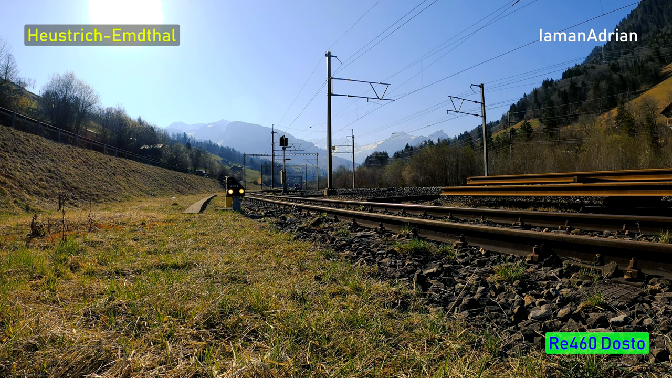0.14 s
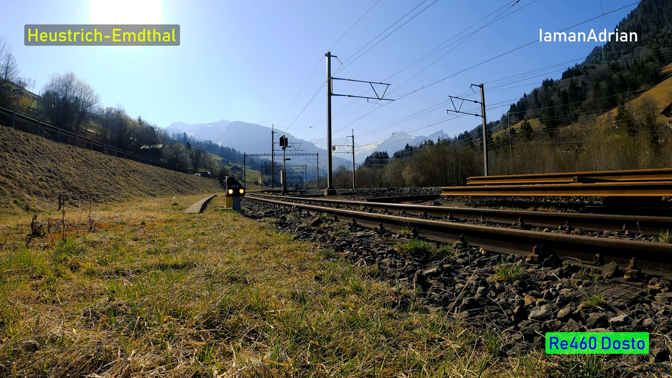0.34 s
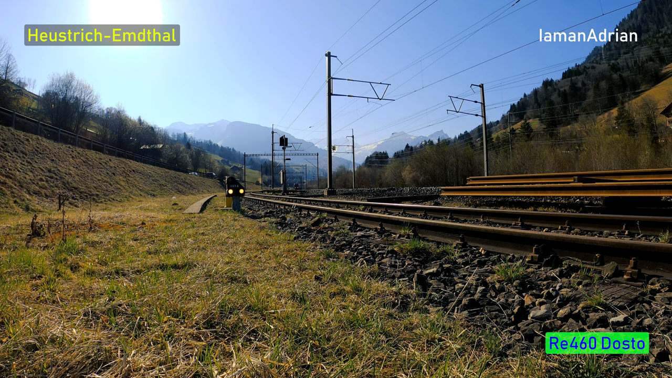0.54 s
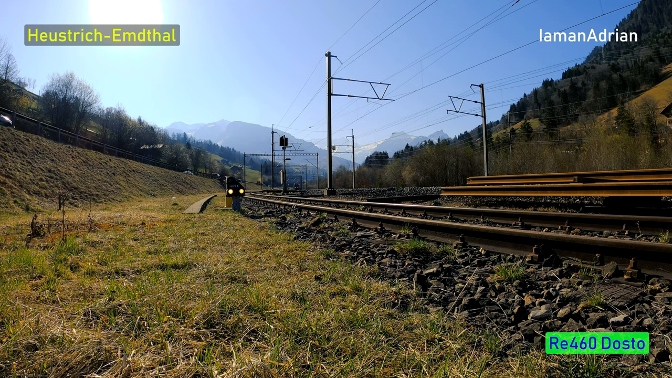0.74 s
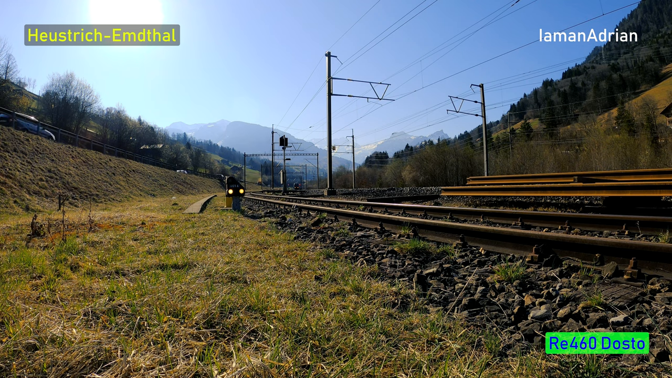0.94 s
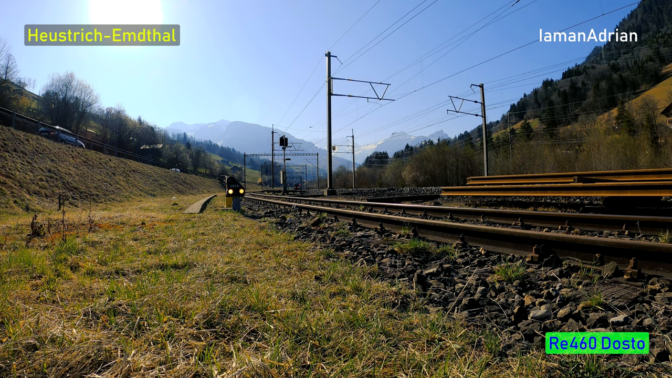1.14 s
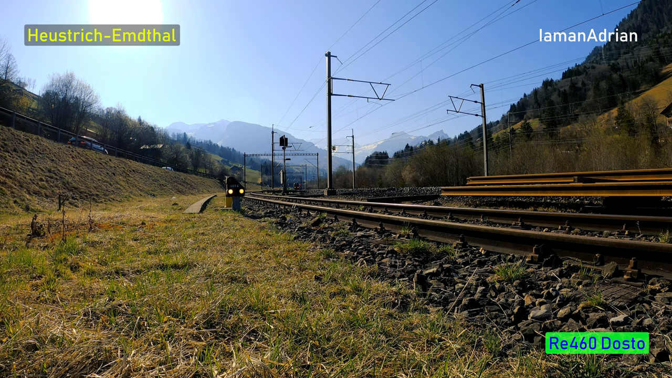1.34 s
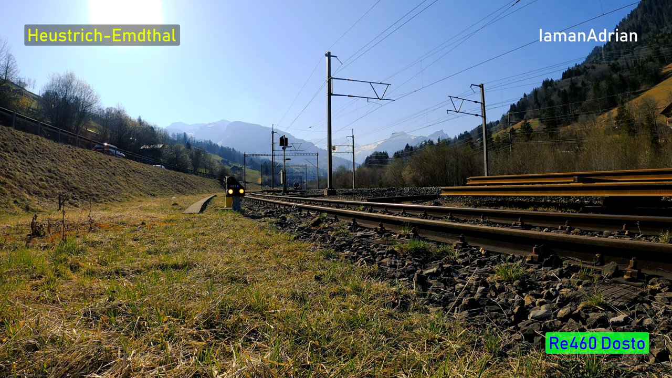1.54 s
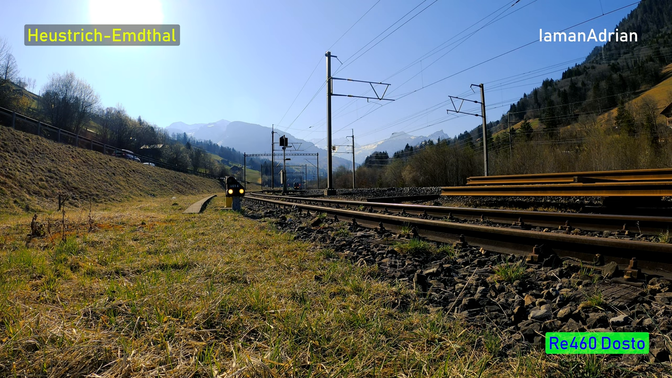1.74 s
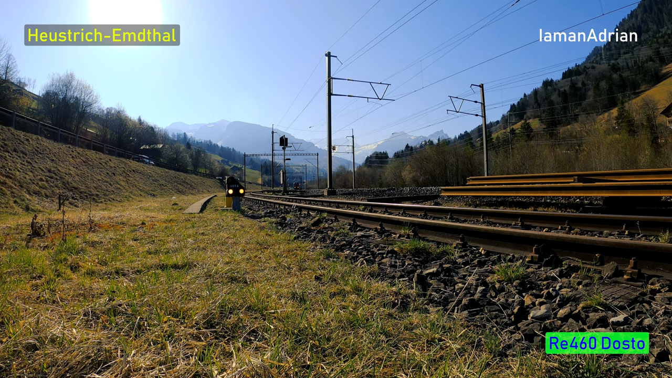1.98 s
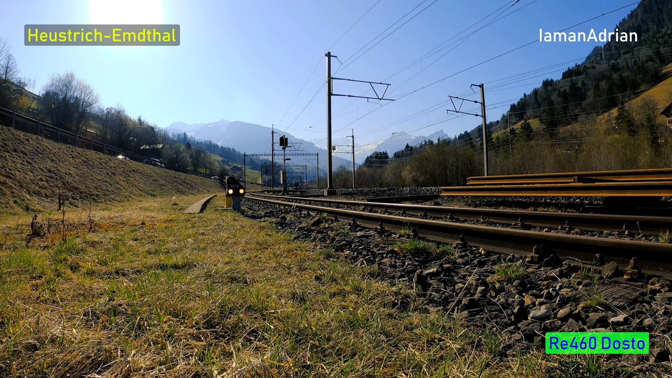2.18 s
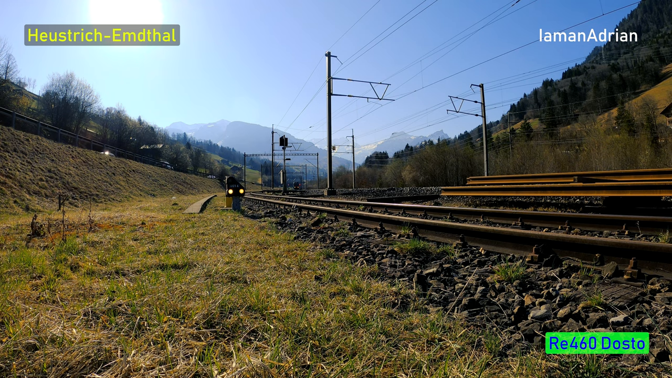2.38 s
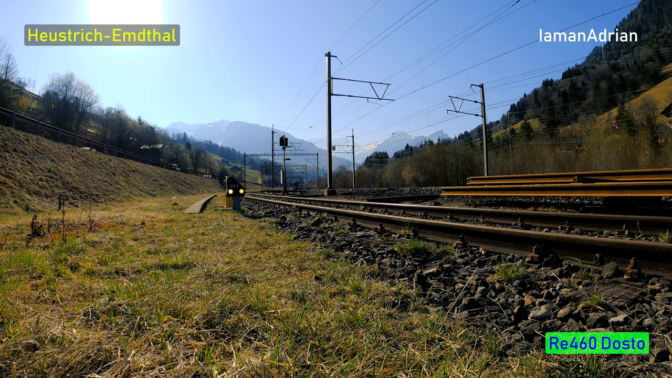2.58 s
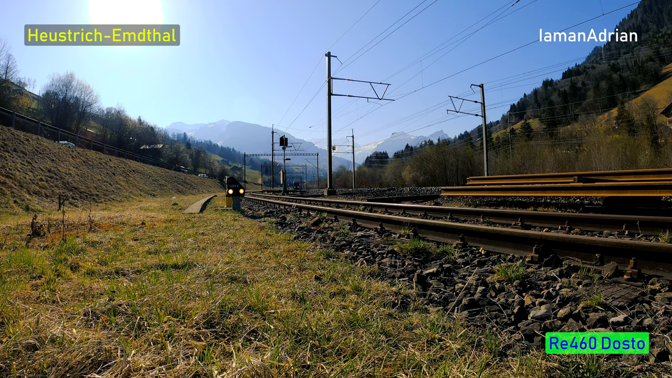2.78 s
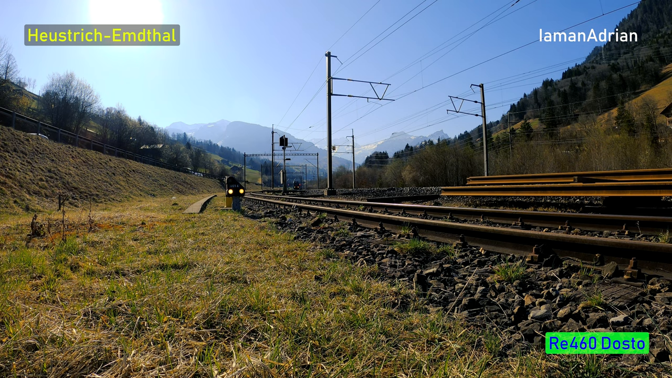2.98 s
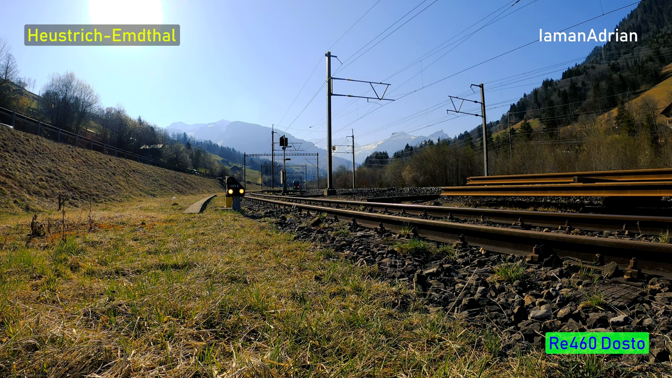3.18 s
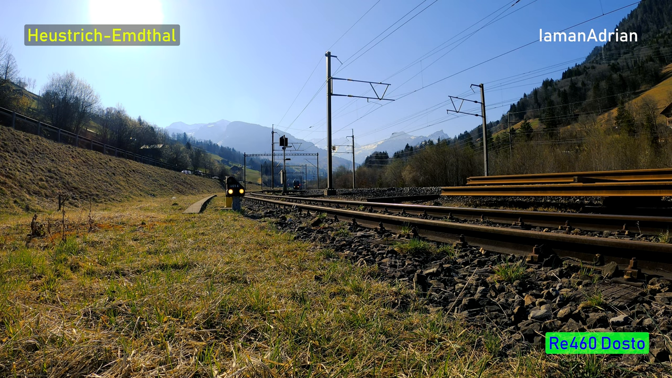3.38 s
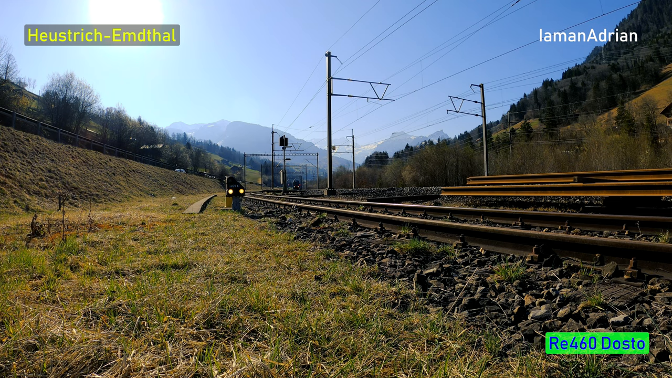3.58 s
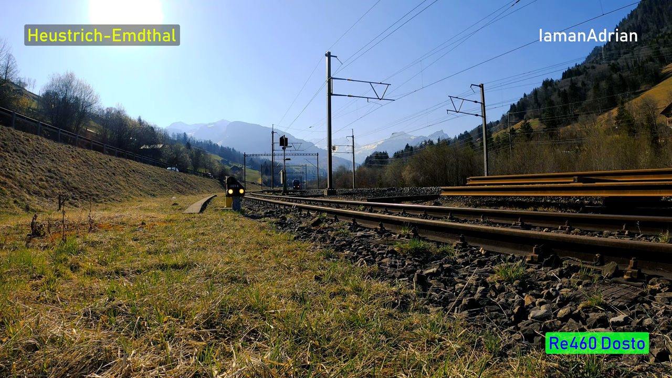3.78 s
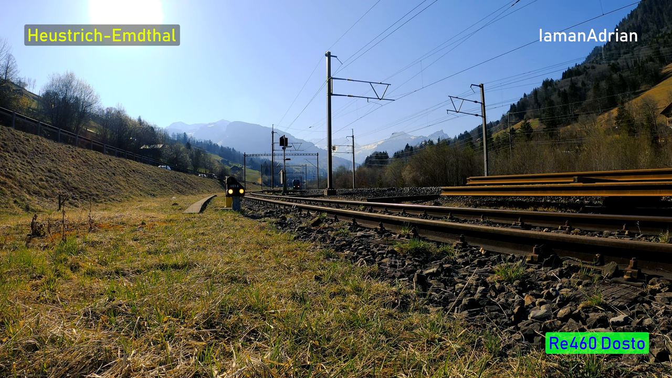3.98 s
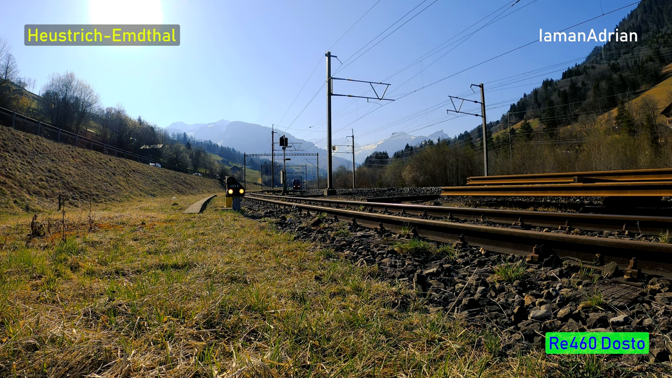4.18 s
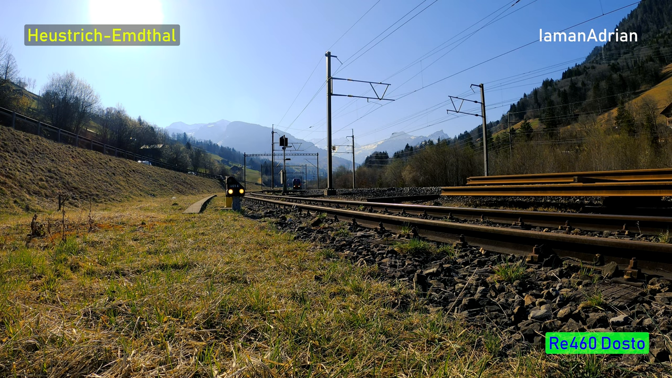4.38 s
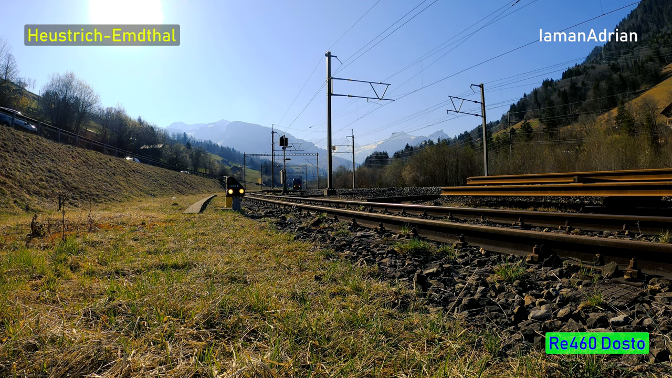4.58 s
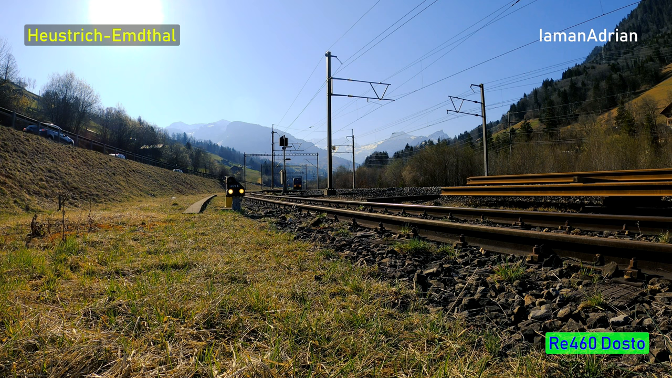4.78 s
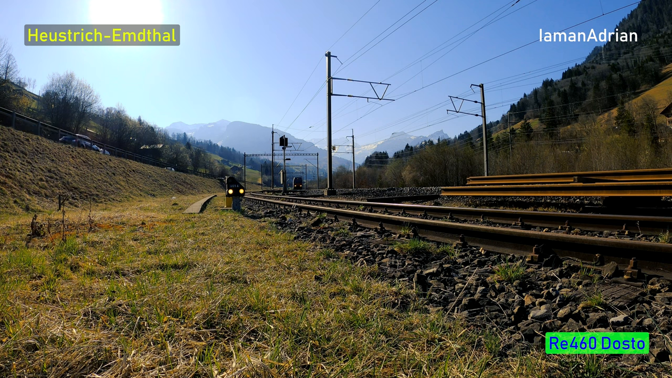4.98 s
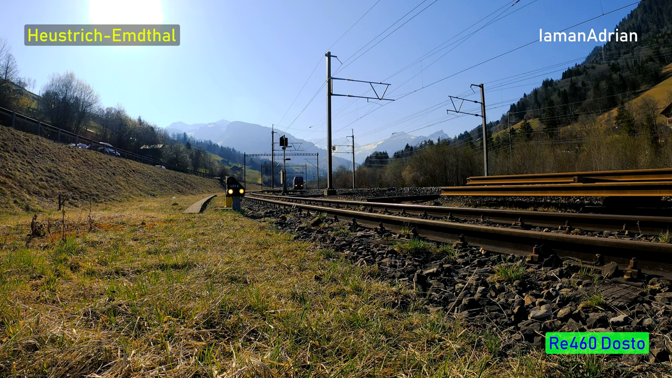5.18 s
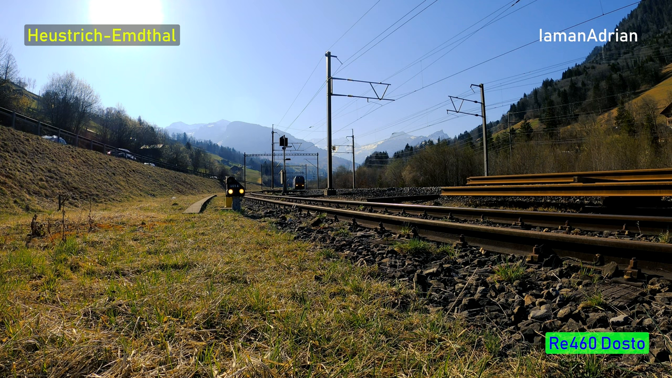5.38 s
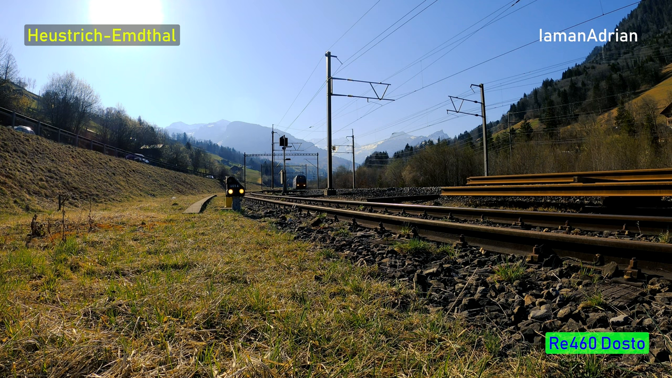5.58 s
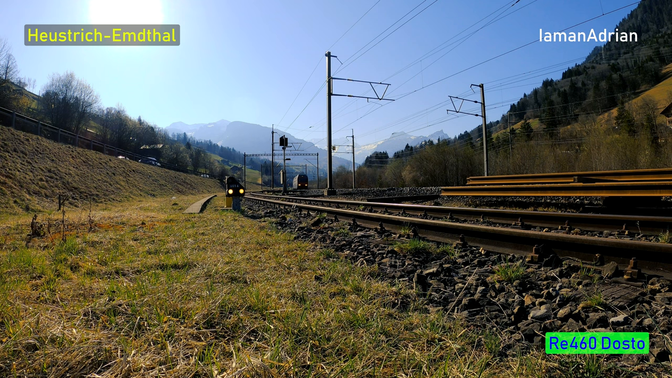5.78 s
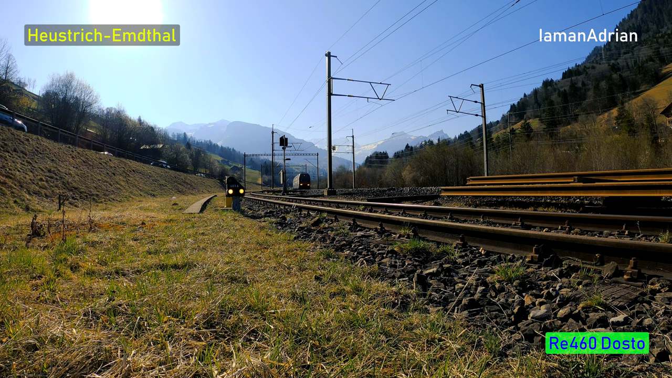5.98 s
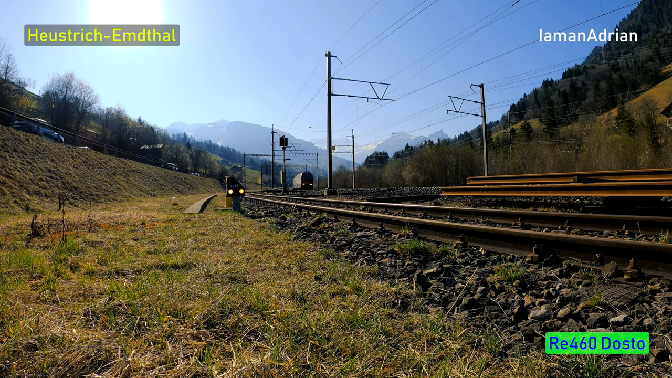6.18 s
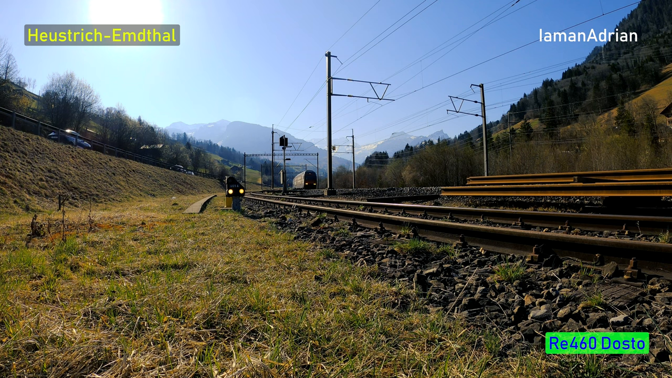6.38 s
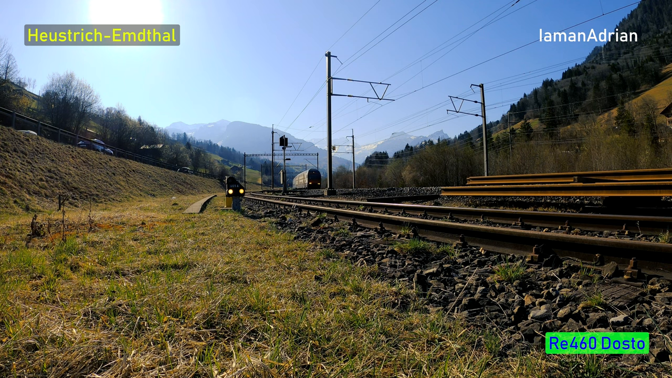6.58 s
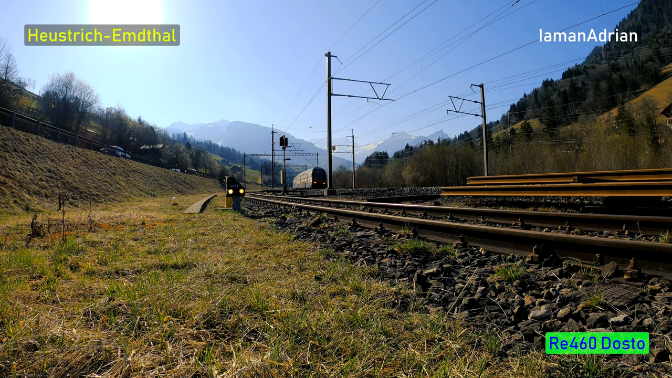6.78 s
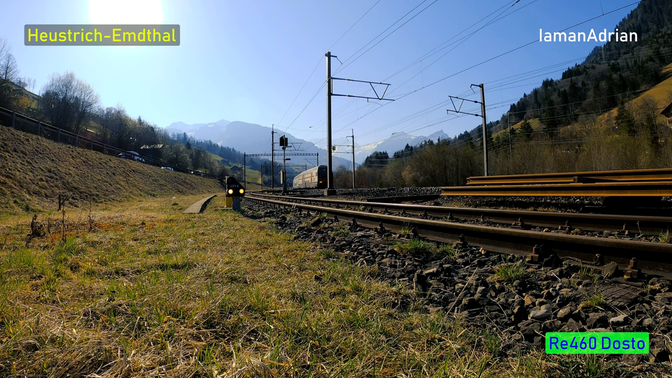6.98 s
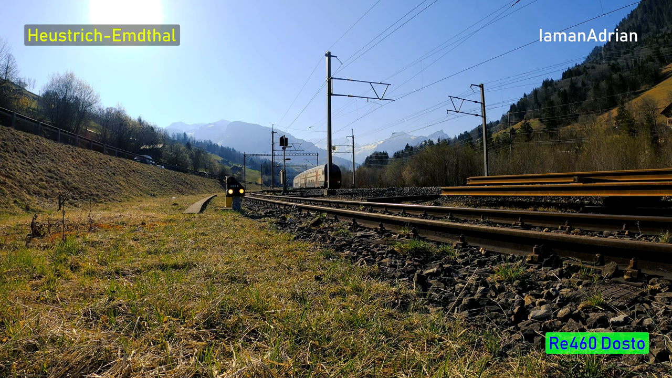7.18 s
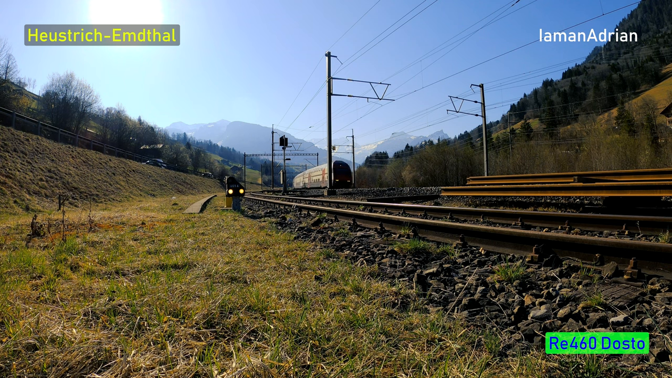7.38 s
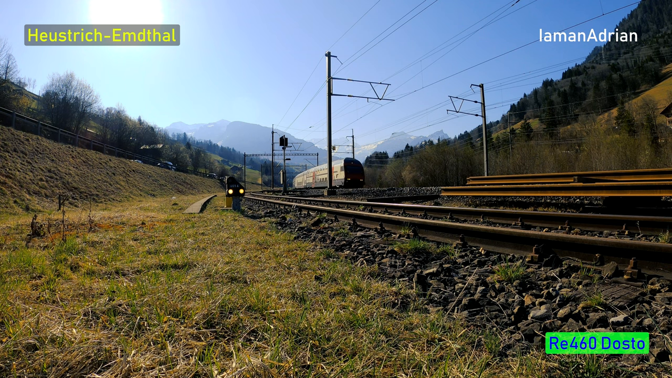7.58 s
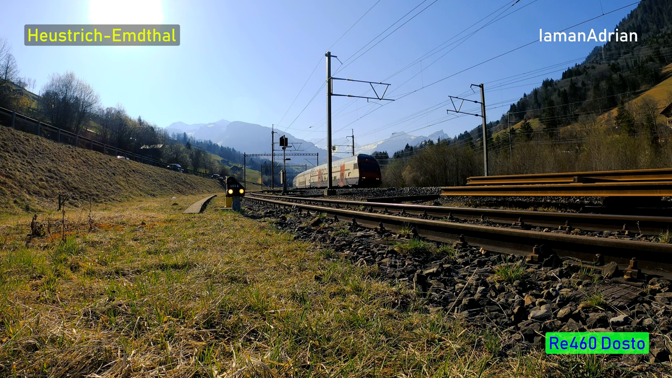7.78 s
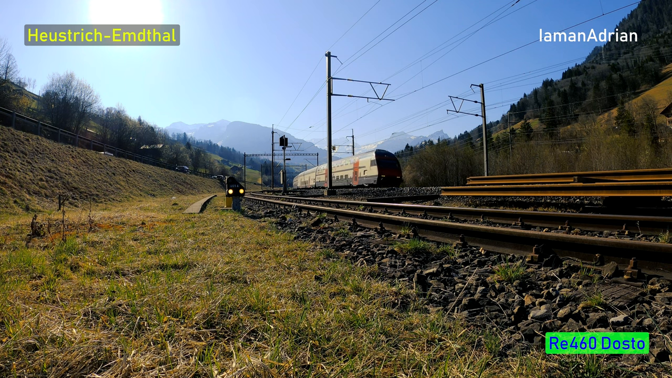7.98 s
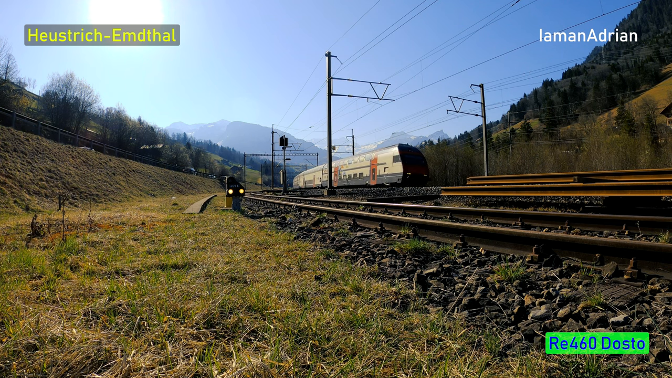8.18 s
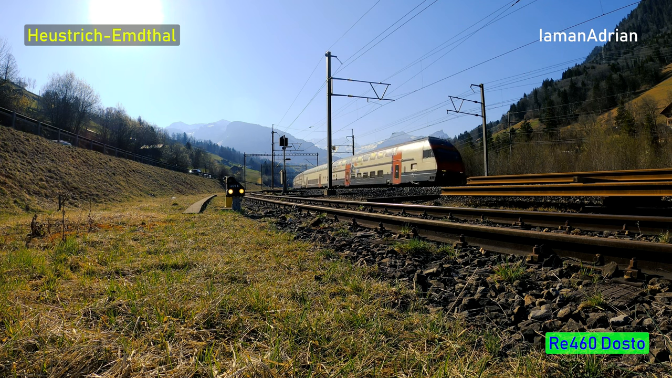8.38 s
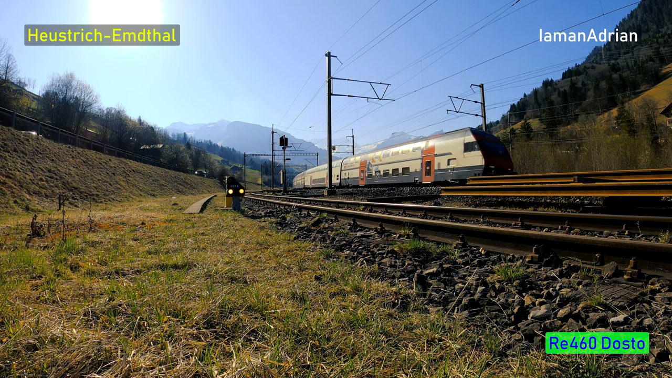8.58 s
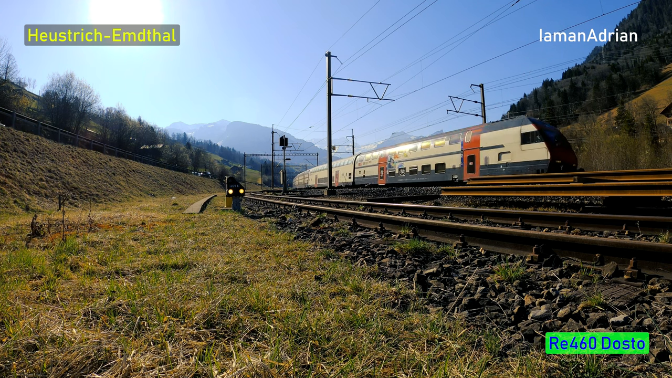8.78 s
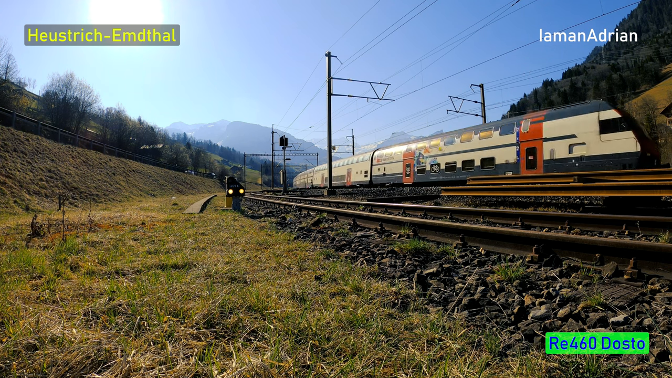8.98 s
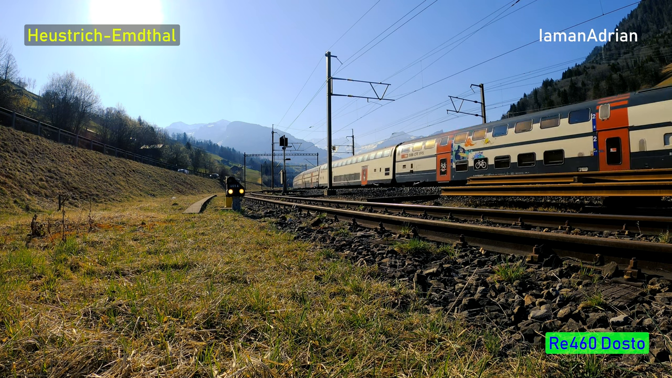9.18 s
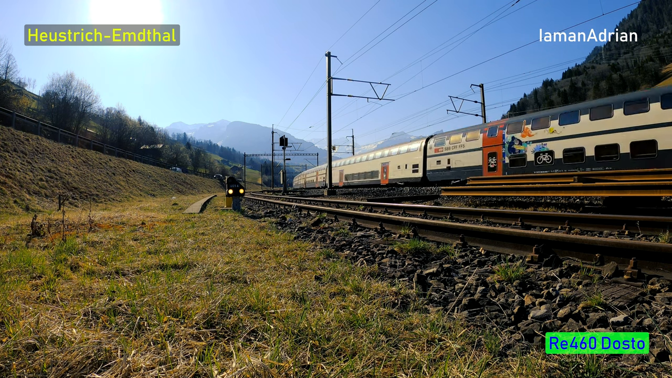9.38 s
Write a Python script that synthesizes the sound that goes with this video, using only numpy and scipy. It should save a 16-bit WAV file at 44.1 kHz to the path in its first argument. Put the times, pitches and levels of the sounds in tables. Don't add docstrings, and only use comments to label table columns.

```python
import sys
import numpy as np
from scipy import signal
from scipy.fft import rfft, irfft, next_fast_len
from scipy.io import wavfile
from scipy.ndimage import uniform_filter1d

SR = 44100
rng = np.random.default_rng(int(sys.argv[2]) if len(sys.argv) > 2 else 0)


def linear_from_db(decibels):
    return 10 ** (np.asarray(decibels, float) / 20)


def unload_audio(sound):
    columns = np.transpose(np.atleast_2d(sound))
    steps = np.round(np.clip(columns, -1, 1) * 32767)
    wavfile.write(sys.argv[1], SR, steps.astype(np.int16))


N = 416734

SIZE, HOP = 1024, 256
HZ = np.fft.rfftfreq(SIZE, 1 / SR)[:, None]
T = np.arange(N // HOP + 5) * HOP / SR
NEAR_DB = -41.5

BANDS = {"road": (1400, 3500), "roar": (700, 2500), "spray": (6500, 10000), "body": (320, 600),
         "wheels": (10000, 14000), "rails": (200, 500)}

# time in seconds, tyre hiss in dB, centre of the ground-echo hump in Hz, hump height
# in dB.
ROAD_TRAFFIC = [(0.28, -47, 2900, 0.3), (0.44, -45, 2950, 3), (0.62, -47, 2500, -1), (0.9, -43.5, 1520, 4),
                (1.3, -43, 1770, 4.5), (1.75, -43, 1990, 3), (2.0, -45, 1740, 1.5), (2.31, -42, 1670, 3.5),
                (2.64, -43.5, 1700, 2), (3.03, -40, 1860, 6.5), (3.4, -42.5, 1550, 5),
                (3.96, -43.5, 1680, 1.5), (4.62, -42, 1750, 4), (5.95, -42, 1700, 3),
                (6.15, -41, 1650, 4.5), (7.4, -42.5, 1660, 3.5), (8.6, -43.5, 1570, 2),
                (9.45, -40.5, 1720, 3.5)]
# frequency in Hz, density in dB per Hz.
ROAD_TONE = [(250, -36), (350, -10.5), (520, -19.5), (700, -14), (870, -7), (1050, -0.5), (1300, -3),
             (1700, -2), (2200, -3), (3000, -5), (4000, -15), (5500, -30), (7000, -37.5), (13000, -81.5)]
# frequency in Hz, likeness 0-1.
ROAD_SAME = [(300, 1), (760, 0.78), (1430, 1), (2700, 0.79), (5000, 1), (9000, 0.61)]
# frequency in Hz, left over right in dB.
ROAD_LEFT = [(400, 0.5), (800, 3), (1500, 0.5), (2500, 5), (5000, 2), (9000, 5.5)]
# frequency in Hz, lead in radians.
ROAD_LEAD = [(300, 0.31), (3000, -0.58), (5250, -0.29)]
# time in seconds, extra tilt in dB per octave,
# half length in seconds.
AIR_SWISHES = [
    (0.44, 4.5, 0.2),
    (1.95, 1.5, 0.41),
    (5.25, -1.3, 0.38),
    (7.3, 2, 0.29),
    (8.0, -0.2, 0.26),
    (9.35, 0.2, 0.29),
]

# time abreast in seconds, tread roar in dB, half length in seconds, closeness 0-1.
CARS = [
    (0.389, -42.5, 0.59, 1.01),
    (3.0, -55.5, .3, 0.4),
    (4.003, -40.5, 0.55, 1.02),
    (4.748, -44.5, 0.61, 0.83),
    (5.552, -44, .4, 1.05),
    (6.502, -43.5, 0.59, .92),
    (7.5, -45, 0.71, 0.8),
    (8.4, -50.5, .4, .45),
    (9.05, -47.5, .25, .8),
    (9.5, -44.5, 0.39, 1.1),
]
# frequency in Hz, level in dB.
ROAR_TONE = [(300, -27), (450, -11.5), (700, -6.5), (870, -3), (1050, 2.5), (1300, -2.5), (1700, -8),
             (2400, -36)]
# frequency in Hz, level in dB.
SPRAY_TONE = [(2500, -4.5), (3500, 9.5), (4500, 11.5), (5500, 5), (7000, -3.5), (9000, -10.5),
              (10500, -21.5), (12000, -26), (14000, -48)]
# frequency in Hz, left over right in dB.
CARS_LEFT = [(400, 3), (800, 10.5), (1200, 9), (4000, 14), (7000, -3), (10000, 7.5), (13000, 4.5)]
# time in seconds, clearness 0-1, half length in seconds.
BANK_GAPS = [
    (-0.05, 1.2, 0.41),
    (3.5, .95, .3),
    (3.9, 1, 0.093),
    (4.4, 0.17, .25),
    (4.85, 0.56, .3),
    (5.35, .85, 0.31),
    (6.6, .3, 0.46),
    (8.05, 0.6, 0.37),
    (9.05, 0.98, 0.58),
]

# time in seconds, level in dB.
VALLEY = [(0.0, -47.5), (0.7, -46.5), (1.6, -50), (2.5, -48), (3.2, -47), (4.0, -46), (4.4, -43.5),
          (5.1, -44.5), (5.75, -44), (6.6, -45), (7.6, -44), (8.45, -45), (8.8, -38.5), (9.25, -40),
          (9.45, -41)]
# time in seconds, level in dB, half length in seconds.
DEEP_SWELLS = [(0.2, -38.5, 0.42), (3.0, -43, 0.11), (3.5, -42.5, 0.17), (4.1, -41.5, 0.3),
               (5.0, -40, 0.35), (5.5, -40, 0.27), (6.0, -38.5, 0.079), (6.7, -40, .4), (7.2, -41, 0.28),
               (7.9, -40, 0.15), (9.0, -37, .14), (9.45, -35.5, 0.14)]
# frequency in Hz, density in dB per Hz.
DEEP_TONE = [(12, -30.5), (20, -18), (28, -3.5), (38, 3.5), (50, 1), (80, 4.5), (105, -6.5), (130, -5.5),
             (170, -30.5)]
# frequency in Hz, density in dB per Hz.
DRONE_TONE = [(50, -12.5), (85, -5.5), (113, -4), (227, -8.5), (340, -21), (440, -57.5), (750, -120)]
# frequency in Hz, level in dB.
BODY_TONE = [(250, -20), (320, -7), (420, 0.5), (550, 2), (700, 4), (850, -22.5)]

# time in seconds, firing rate in Hz, level in dB.
ENGINES = [
    [(0, 65, -42), (.3, 63.5, -39), (.6, 61.5, -41), (2.2, 59.5, -49), (4.2, 58.5, -58)],
    [(3.2, 92, -60), (3.8, 91, -50), (4.6, 88, -49), (5.2, 85, -47), (5.9, 79.5, -48)],
    [(5.85, 79.5, -48), (6.2, 78.5, -49), (7.2, 77, -50), (8.1, 75, -47), (8.6, 73.5, -48),
     (9.2, 72.5, -44), (9.45, 72, -47)],
    [(4.9, 50, -56), (5.2, 50.5, -40), (5.6, 49, -36), (5.8, 46, -39), (5.93, 43, -54), (6.07, 40, -37),
     (6.2, 40, -58)],
    [(4.95, 34, -56), (5.2, 33.5, -42), (5.6, 33, -42), (5.8, 33, -56)],
    [(6.1, 48.5, -56), (6.5, 48.5, -47), (7.4, 49, -46), (7.65, 49.2, -39), (8.25, 49.2, -43),
     (8.5, 49.2, -38), (9.1, 49, -35), (9.45, 47.5, -36)],
    [(.3, 241, -68), (.45, 240, -51), (.62, 240, -51), (.8, 239, -68)],
]
# relative level at start in dB, at end in dB.
OCTAVES = [(-30, -18), (-16, -18), (-7, -6), (-26, -28), (-14, -14), (-28, -17), (-25, -25)]

# time in seconds, buffeting at each port in dB, half length in seconds.
GUSTS = [
    (0.7, -60, 0.45),
    (5.0, -51.5, 0.4),
    (7.5, -49.5, 0.36),
    (8.75, -51, 0.73),
]
# frequency in Hz, level in dB.
GUST_TONE = [(8, -6), (20, -2), (45, 10.5), (75, -5), (140, -33.5), (200, -7), (300, -18), (500, -80)]
# time in seconds, peak in dB, frequency in Hz, share on the right port 0-1.
EDDIES = [(0.241, -40, 67, 1), (0.522, -33, 42, 0), (0.572, -36, 72, 0), (0.691, -39, 44, 0.1),
          (4.423, -42, 67, 0), (4.55, -37, 85, 0.2), (5.033, -32, 43, 0.2), (5.502, -37, 51, 1),
          (5.569, -29, 45, 0.2), (5.707, -28, 62, 0.14), (6.841, -35, 52.7, 0.1), (7.377, -37.5, 34, 0.1),
          (7.417, -36, 63, 0.1), (7.568, -33, 37, 1), (7.64, -32, 69, 0), (7.69, -36, 47, 1),
          (7.862, -34, 43.3, 0), (8.141, -26, 49, 0.4), (8.432, -36, 32, .1), (8.571, -27, 45, 0),
          (8.63, -30, 39, 0.25), (8.88, -35, 35, 0), (8.938, -35, 43.3, 1), (9.258, -26, 42, 0.3)]

# time in seconds, level in dB.
TRACK_BOOM = [
    (7.4, -76),
    (8.2, -56.5),
    (8.5, -52),
    (8.85, -51),
    (9.1, -60),
    (9.45, -67),
]
# frequency in Hz, level in dB.
RAIL_TONE = [(150, -31), (220, -4), (290, 0.5), (370, -5.5), (450, -10), (560, -31.5)]
# frequency in Hz, density in dB per Hz.
WHEEL_TONE = [(2500, -6.5), (4000, 26.5), (5500, 18), (7000, 10.5), (9000, 7.5), (10500, -3), (12000, 0),
              (13500, -5), (15500, -14)]


def evened(x):
    return x / np.sqrt(np.mean(x ** 2) + 1e-20)


def read(points, hz=HZ):
    f, value = np.transpose(points)
    return np.interp(np.log(hz + 1), np.log(f + 1), value)


def closed(points, hz=HZ):
    return linear_from_db(read(points, hz)) * (hz >= points[0][0]) * (hz <= points[-1][0])


def curves(rows, t=T):
    s, *columns = np.transpose(rows)
    return [np.interp(t, s, c) for c in columns]


def bumps(rows, t=T):
    return sum(height * np.exp(-((t - s) / half) ** 2) for s, height, half in rows)


def swells(rows, floor_db, t=T):
    powers = [(s, linear_from_db(db) ** 2, half) for s, db, half in rows]
    return 10 * np.log10(linear_from_db(floor_db) ** 2 + bumps(powers, t))


def hiss(tone, band, level_db, same, left_db=0, lead=0, patchy_db=1.2):
    a, b, c, d, patch = rng.standard_normal((len(T), len(HZ), 5)).T
    patch = uniform_filter1d(patch, size=12, axis=0)
    patch = evened(uniform_filter1d(patch, size=24, axis=1))
    same = np.clip(same, 0, 1)
    left = a + 1j * b
    right = same * left + np.sqrt(1 - same ** 2) * (c + 1j * d)
    right = right * np.exp(-1j * lead)
    inside = (HZ[:, 0] > band[0]) & (HZ[:, 0] < band[1])
    in_band = np.sqrt(np.sum(tone[inside] ** 2, axis=0))
    gain = tone / in_band * linear_from_db(level_db + patchy_db * patch) * 1.2
    z = np.array([left * gain * linear_from_db(left_db / 2), right * gain / linear_from_db(left_db / 2)])
    return signal.istft(z, nperseg=SIZE, noverlap=SIZE - HOP)[1][:, :N]


def tinted(tone):
    size = next_fast_len(N)
    z = rfft(rng.standard_normal((2, size))) * closed(tone, np.fft.rfftfreq(size, 1 / SR))
    return evened(irfft(z, size)[:, :N])


def road():
    level_db, hump_hz, hump_db = curves(ROAD_TRAFFIC)
    tilt_db = -2.5 - 0.1 * np.clip(level_db + 42.4, -2, 2) + bumps(AIR_SWISHES)
    above = np.log2((HZ + 1) / hump_hz)
    notch = 0.36 * np.exp(-((above + 0.52) / .25) ** 2)
    hump = hump_db * (np.exp(-(above / .22) ** 2) - notch)
    tilt = tilt_db * np.clip(np.log2((HZ + 1) / 2000), -1, 1)
    tone = closed(ROAD_TONE) * linear_from_db(hump + tilt)
    return hiss(tone, BANDS["road"], level_db - .3, read(ROAD_SAME), read(ROAD_LEFT), read(ROAD_LEAD),
                patchy_db=.6)


def passing():
    s, db, half, close = np.transpose(CARS)[:, :, None]
    no_car_db, fade, reach = -70.5, 2.27, 1.7
    away = (T - s) / half
    power = linear_from_db(no_car_db) ** 2 + np.sum(linear_from_db(db) ** 2 / (1 + away ** 2) ** fade, axis=0)
    return 10 * np.log10(power), np.max(close * np.exp(-(away / reach) ** 2), axis=0)


def cars():
    roar_db, close = passing()
    clear = bumps(BANK_GAPS)
    left_db = read(CARS_LEFT)

    hump_hz = 1003 * 2 ** (0.98 * (1 - close))
    bank = linear_from_db(-4.5 / (1 + ((HZ + 1) / 870) ** 24))
    tone = closed(ROAR_TONE, HZ * 1050 / hump_hz) * bank
    roar_lead = -.4 - 2.64 * clear
    roar = hiss(tone, BANDS["roar"], roar_db - .3, .62, left_db, roar_lead, patchy_db=.6)

    spray_db = -77.5 + 0.47 * (roar_db - NEAR_DB) + 1.5 * clear
    tilt_db = -7.5 + 20 * clear
    tone = closed(SPRAY_TONE) * linear_from_db(tilt_db * np.log2(np.maximum(HZ, 8000) / 8000))
    spray_lead = 2.15 * np.log2((HZ + 1) / 3700)
    return roar + hiss(tone, BANDS["spray"], spray_db - 0.1, 0.4, left_db, spray_lead, patchy_db=2.0)


def rumble():
    t = np.arange(N) / SR
    valley_db, = curves(VALLEY)
    over_db = valley_db - NEAR_DB
    drone_db = np.interp(t, T, valley_db)
    deep_db = np.interp(t, T, swells(DEEP_SWELLS, -47.5 - 0.07 * over_db))
    low = linear_from_db(deep_db - 1.04) * tinted(DEEP_TONE) + linear_from_db(drone_db + 0.3) * tinted(DRONE_TONE)
    low = np.array([low[0] + 0.05 * low[1], low[0] - .06 * low[1]])
    low = low * linear_from_db(np.array([[.25], [-.25]]))
    of_cars_db = 0.23 * (passing()[0] - NEAR_DB)
    body_db = -61 + 2.0 + .5 * over_db + of_cars_db + 1.5 * bumps(BANK_GAPS)
    return low + hiss(closed(BODY_TONE), BANDS["body"], body_db, 0.96, .3, patchy_db=1.5)


def engines():
    out = np.zeros(N)
    for rows, octave_db in zip(ENGINES, OCTAVES):
        at = np.arange(round(rows[0][0] * SR), min(round(rows[-1][0] * SR), N))
        hz, first_db = curves(rows, at / SR)
        drift, flutter = (evened(uniform_filter1d(v, size=4000)) for v in rng.standard_normal((2, len(at))))
        turn = 2 * np.pi * (np.cumsum(hz * (1 + 0.0069 * drift)) / SR + rng.random())
        octave = linear_from_db(np.linspace(*octave_db, len(at))) * np.sin(2 * turn)
        hum = linear_from_db(first_db) * (np.sin(turn) + octave)
        out[at] += np.sqrt(2) * hum * linear_from_db(0.34 * flutter) * signal.windows.tukey(len(at), .03)
    return out


def gusts():
    calm_db = -70
    level_db = np.interp(np.arange(N) / SR, T, swells(GUSTS, calm_db))
    out = linear_from_db(level_db + 0.5) * tinted(GUST_TONE)
    for (s, db, hz, right), (phase, tighten) in zip(EDDIES, rng.random((len(EDDIES), 2))):
        turns = np.arange(-2, 2, hz / SR)
        squeeze = 1 + .5 * tighten ** 2 * np.maximum(turns + 0.27, 0) ** 2
        push = np.cos(2 * np.pi * (turns * squeeze + phase)) * np.exp(-(turns / 0.75) ** 2)
        at = round(s * SR) + np.arange(len(turns)) - len(turns) // 2
        out[:, at] += linear_from_db(db) * push * np.clip([[1 - right], [right]], 0, 1)
    return out


def train():
    boom = hiss(closed(RAIL_TONE), BANDS["rails"], curves(TRACK_BOOM)[0], 0.92, -1.2, patchy_db=2.0)
    clear_s, open_s = 8.545, .03
    since = T - clear_s
    after = np.maximum(since, 0)
    shaded_db = -103 - 60 * np.clip(-.25 - since, 0, 1)
    open_db = -83 - 0.5 * since
    level_db = shaded_db + (open_db - shaded_db) * np.clip(since / open_s + 1, 0, 1)
    left_db = -5 + 3 * after
    tilt_db = -62 + 62 * after
    top = linear_from_db(tilt_db * np.log2(np.maximum(HZ, 12500) / 12500))
    tone = closed(WHEEL_TONE) * top
    return boom + hiss(tone, BANDS["wheels"], level_db, 0.28, left_db, HZ * -1.2e-4, patchy_db=1.0)


def scene():
    return road() + cars() + rumble() + engines() + gusts() + train()


def low_pass(x):
    return signal.sosfilt(signal.butter(12, 15000, fs=SR, output="sos"), x)


def record(dry):
    hz, _, z = signal.stft(dry, SR, nperseg=SIZE)
    edges_hz = [7600, 8300, 9000, 9700, 10400, 11200, 12700, 13400, 14200, 15000]
    band = np.digitize(hz, edges_hz)
    power = np.array([(abs(z[:, band == k]) ** 2).mean(axis=(0, 1)) for k in range(11)])
    threshold_db = read([(9000, -117), (12000, -117), (13000, -113), (14600, -111)], hz)
    heard = power[band] > linear_from_db(threshold_db[:, None]) ** 2
    heard = heard | (band == 0)[:, None]
    kept = signal.istft(z * heard, SR, nperseg=SIZE)[1][:, :N]
    return low_pass(kept)


dry = scene()
out = record(dry)
unload_audio(out)
```